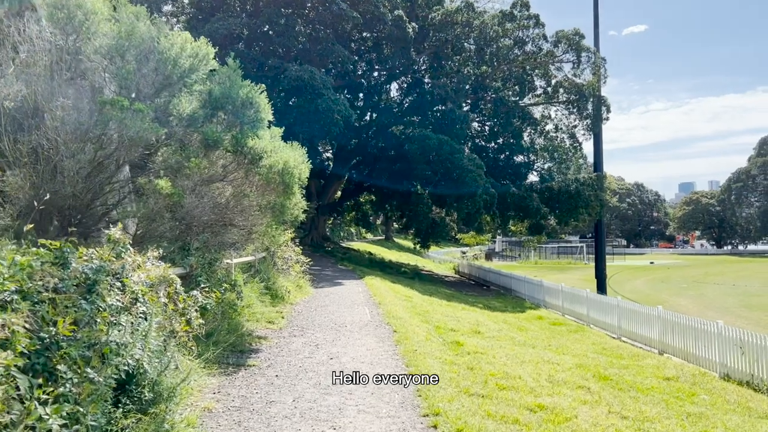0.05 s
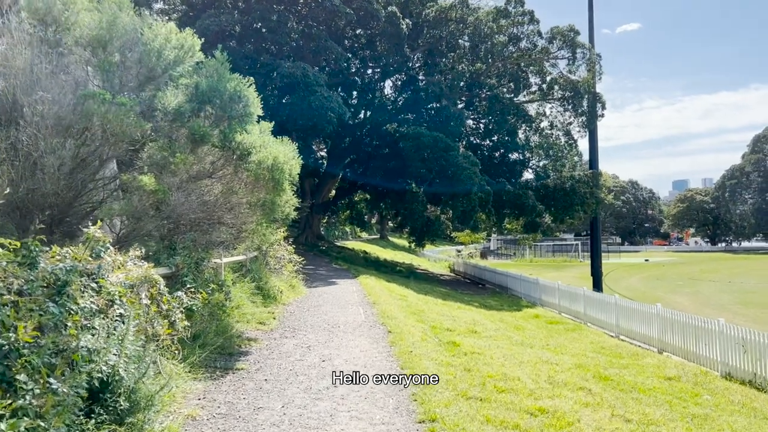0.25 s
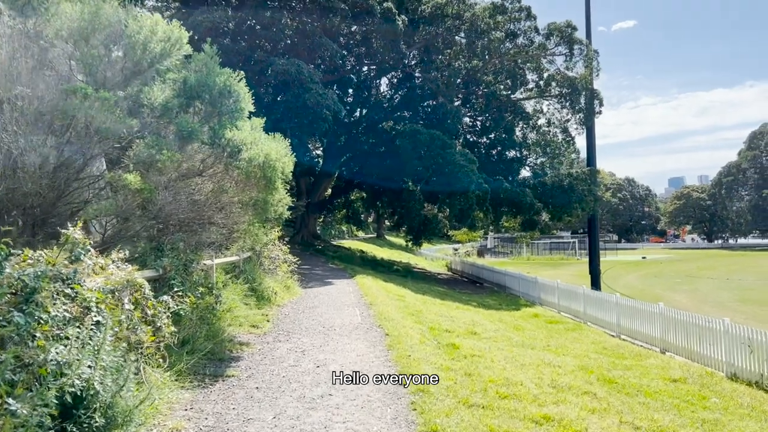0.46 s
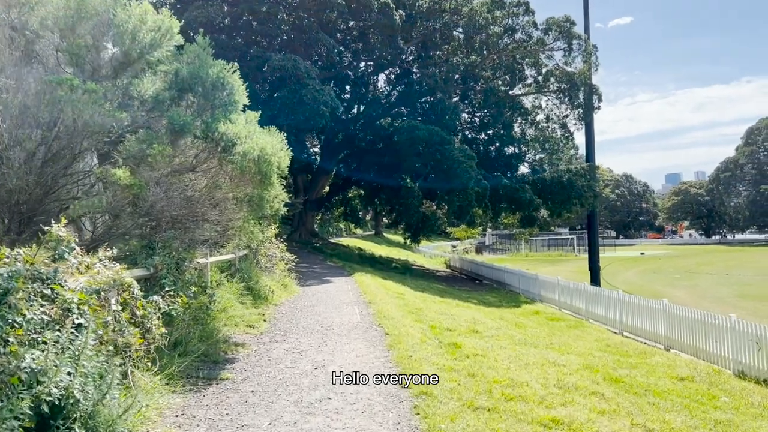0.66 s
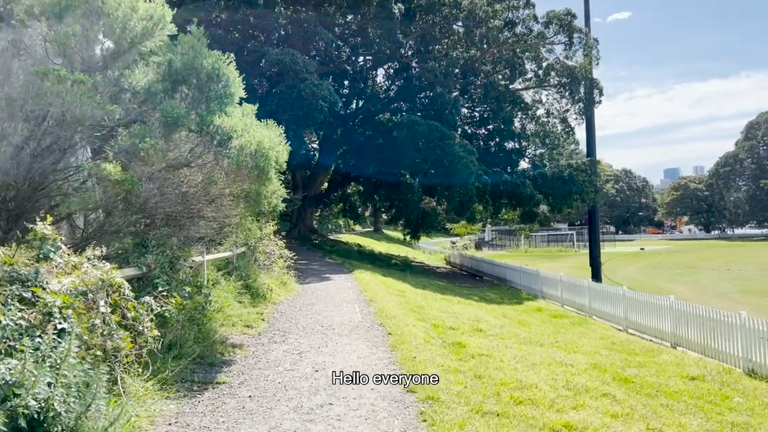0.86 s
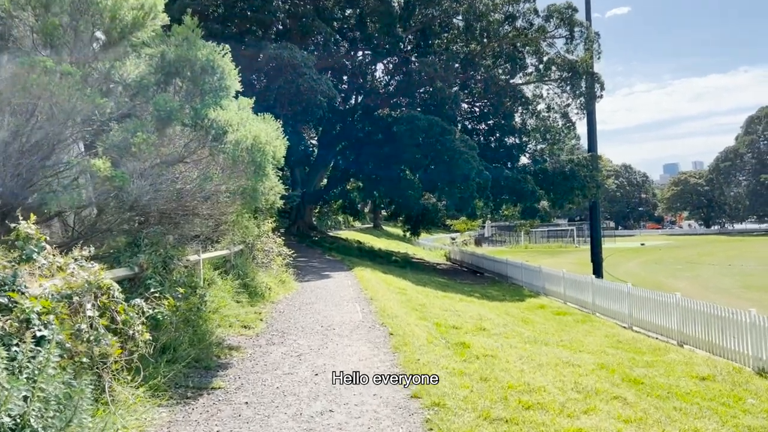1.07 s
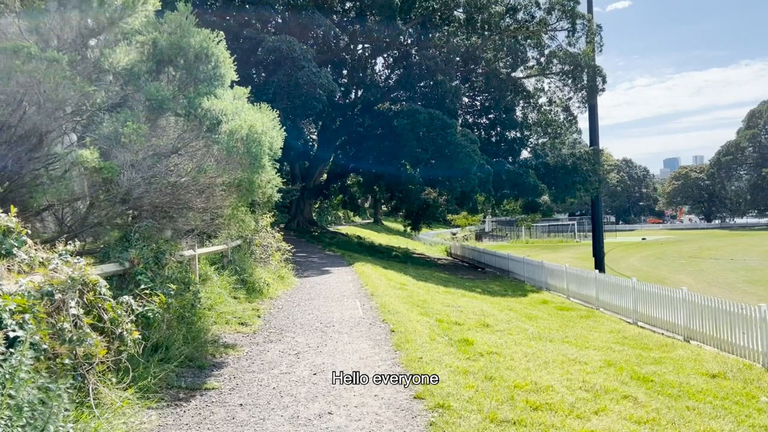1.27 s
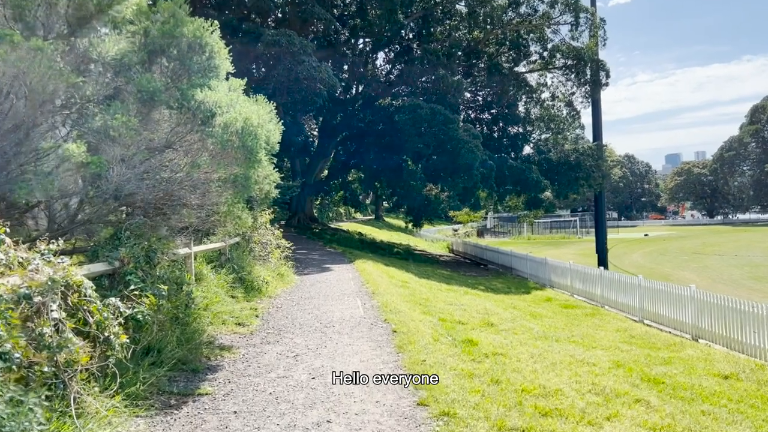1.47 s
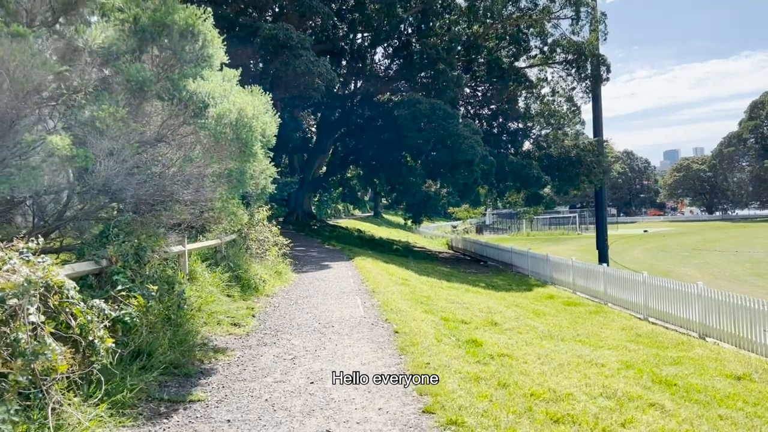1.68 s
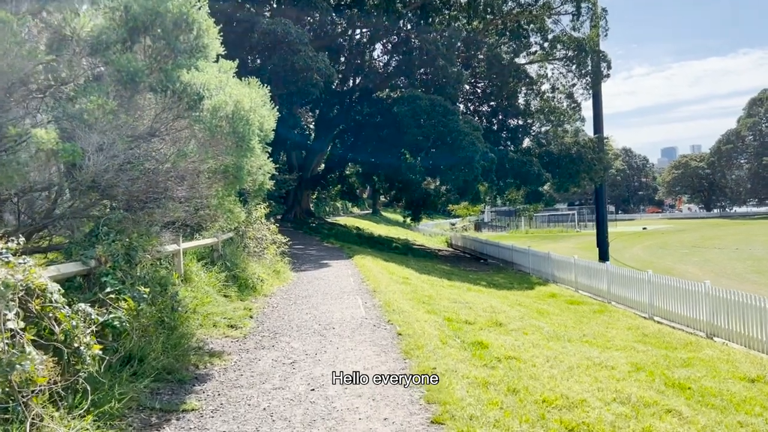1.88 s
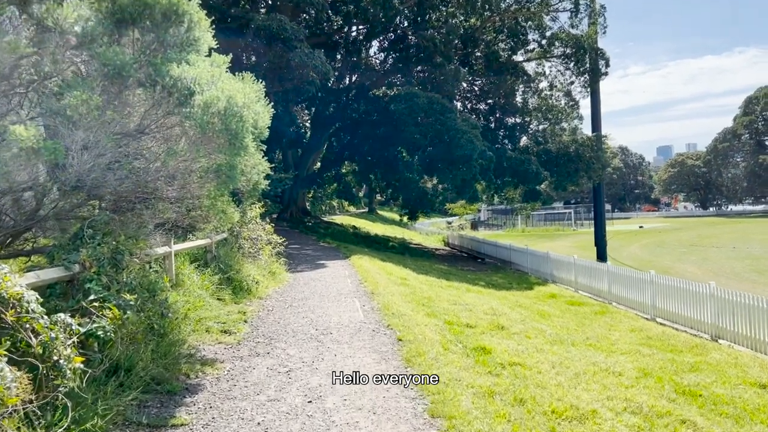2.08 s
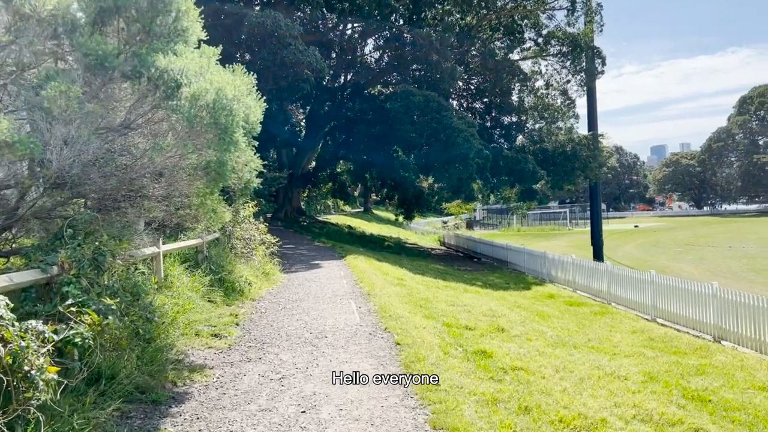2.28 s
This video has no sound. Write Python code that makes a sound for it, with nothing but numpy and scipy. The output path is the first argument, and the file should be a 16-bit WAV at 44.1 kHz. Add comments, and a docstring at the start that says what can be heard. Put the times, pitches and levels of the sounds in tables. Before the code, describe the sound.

Footsteps crunch on a gravel path, with low wind rumble and soft handling bumps on the microphone

```python
"""Footsteps on a gravel path in a park, about two a second, heard from a microphone the walker carries.
Each step grinds a swarm of small stones and sand; larger stones snap as short rings, grit ticks as noise bursts.
Clothes swish as shaped noise, and the hand bumps the recorder with soft slowing swings.
Air rumbles on the microphone as low noise over a faint town, wavering tones of a distant machine
and a few far bird whistles with gliding pitch."""
import sys
import numpy as np
from scipy import signal
from scipy.fft import rfft, irfft
from scipy.io import wavfile
from scipy.ndimage import uniform_filter1d

SR = 44100
rng = np.random.default_rng(int(sys.argv[2]) if len(sys.argv) > 2 else 0)


def log_audio(samples):
    """Write samples as a 16-bit WAV file to the path given in sys.argv[1]."""
    # one column per channel
    frames = np.atleast_2d(samples).T
    # limit to full scale, then quantise
    limited = np.clip(frames, -1, 1)
    pcm = np.round(limited * 32767).astype(np.int16)
    wavfile.write(sys.argv[1], SR, pcm)


N = 102929

# Noise that differs between the two sides. Each row: frequency in Hz, relative level in dB.
DIFFUSE = [(100, -5.5), (1200, 5.5), (2500, 0.5), (6500, 5.5), (9500, -14), (13000, -26)]
# Slow rise of town and loose gravel. Each row: time in seconds, level change in dB.
BACKGROUND_RISE = [(0, -6.5), (.2, -2.5), (.55, 0), (2.33, 1.5)]


def undb(db):
    """Decibels to gain."""
    return 10 ** (np.asarray(db) / 20)


def unit(x):
    """Scale to rms 1."""
    return x / np.sqrt(np.mean(x ** 2))


def over_time(t, points):
    """Interpolate (seconds, value) points linearly."""
    seconds, value = np.array(points).T
    return np.interp(t, seconds, value)


def across(points):
    """Interpolate (Hz, value) points over log frequency at every FFT bin."""
    hz, value = np.array(points).T
    bins_hz = np.fft.rfftfreq(2 * N, 1 / SR)
    return np.interp(np.log(bins_hz + 1), np.log(hz), value)


def colour(x, points):
    """Filter by (Hz, dB) points."""
    return irfft(rfft(x, 2 * N) * undb(across(points)))[..., :N]


def walk(rate_hz):
    """Smoothed random steps, rms 1."""
    k = int(SR / rate_hz)
    steps = np.repeat(rng.standard_normal(N // k + 1), k)
    smooth = uniform_filter1d(uniform_filter1d(steps, k), k)
    return unit(smooth[:N])


def air(points):
    """Coloured noise, partly different on each side, rms 1."""
    common = rng.standard_normal(N)
    separate = colour(rng.standard_normal((2, N)), DIFFUSE)
    return unit(colour(common + separate, points))


def rings(times_s, gains, pitches_hz, decay_cycles, size=400):
    """Stone rings: build up during the contact, then fall by 1/e per decay_cycles."""
    contact_cycles = 0.57
    out, t = np.zeros(N + size), np.arange(size) / SR
    for start_s, gain, hz in zip(times_s, gains, pitches_hz):
        i = int(np.clip(start_s * SR, 0, N))
        cycles = hz * t
        envelope = (1 - np.exp(-cycles / contact_cycles)) * np.exp(-cycles / decay_cycles)
        out[i:i + size] += 2 * gain * np.sin(2 * np.pi * cycles) * envelope
    return out[:N]


def contact_gains(chance, scatter_db):
    """Many small contacts and a few large ones."""
    return undb(-scatter_db * np.log(.02 + .98 * chance))


def town(t):
    """Far traffic as faint coloured noise; its level flickers a little and rises."""
    town_spectrum = [(25, 1), (60, 3.5), (150, 4.5), (280, -4.5), (450, -13), (750, -19.5), (1300, -24),
                     (3000, -24.5), (6000, -34), (9000, -35.5), (15000, -38)]  # Each row: frequency in Hz, relative level in dB.
    level_db, flicker_db, flicker_hz = -45.5, 0.5, 9.7
    change_db = flicker_db * walk(flicker_hz) + over_time(t, BACKGROUND_RISE)
    return air(town_spectrum) * undb(level_db + change_db)


def air_rumble(t):
    """Air buffets the microphone: low noise with an uneven level."""
    # Each row: frequency in Hz, relative level in dB.
    rumble_spectrum = [(20, -29), (35, -8), (58, 4.5), (120, -3.5), (220, -12), (400, -21), (900, -44),
                       (3000, -84)]
    # Each row: time in seconds, level in dB before trim.
    rumble_level = [(0.0, -42), (0.06, -43.5), (0.45, -59), (0.59, -29.5), (0.62, -37.5), (1.0, -37.5),
                    (1.11, -50), (1.19, -46.5), (1.34, -31.5), (1.41, -46.5), (1.69, -38.5), (1.74, -40.5),
                    (1.885, -31.5), (1.95, -40), (1.97, -35.5), (2.16, -38.5), (2.2, -36.5), (2.23, -45.5),
                    (2.33, -34)]
    trim_db = -1
    return air(rumble_spectrum) * undb(over_time(t, rumble_level) + trim_db)


def pebbles(rate_per_s):
    """An even swarm of small stones clicking together, each from its own direction, rms 1."""
    centre_hz, spread_octaves, decay_cycles, scatter_db = 1536, 0.57, 0.84, 4.5
    lag_s, pan_db = 0.00014, 11.5  # full ranges, split between the sides
    when, chance, a, b, sign, place, pan = rng.random((int(rate_per_s * N / SR), 7)).T
    hz = centre_hz * 2 ** (spread_octaves * np.sqrt(6) * (a - b))
    gain = np.sign(sign - .5) * contact_gains(chance, scatter_db)
    sides = []
    for side in (1, -1):
        side_s = when * N / SR + side * lag_s * (place - .5)
        side_gain = gain * undb(side * pan_db * (pan - .5))
        sides.append(rings(side_s, side_gain, hz, decay_cycles))
    return unit(np.array(sides))


def loose_gravel(t):
    """A sparser swarm of clicks that lasts throughout and rises with the town."""
    rate_per_s, level_db = 600, -58
    return undb(level_db + over_time(t, BACKGROUND_RISE)) * pebbles(rate_per_s)


def hand_bumps(t):
    """The hand bumps the recorder with soft swings that slow down and die."""
    # Each row: start in seconds, level in dB before trim, starting pitch in Hz.
    bump_events = [(.03, -36.5, 246), (.033, -36.5, 465), (.125, -42, 190), (0.138, -42, 400),
                   (0.165, -41, 94.5), (.495, -41, 200), (.568, -31, 121), (0.576, -41, 282),
                   (.598, -39, 240), (0.646, -37, 415), (0.653, -37.5, 324), (0.659, -28, 212),
                   (.70, -31, 165), (0.749, -27, 195), (.756, -35, 266), (0.765, -26, 352),
                   (.77, -23.5, 184), (.845, -39, 338), (0.853, -32.5, 144), (.92, -31, 144),
                   (.978, -32, 125), (1.234, -32, 190), (1.312, -33, 248), (1.323, -28.5, 145),
                   (1.336, -34, 240), (1.46, -35, 105), (1.529, -36, 75), (1.603, -29, 210),
                   (1.664, -25.5, 115), (1.696, -30.5, 163), (1.804, -25.5, 219), (1.865, -33, 277),
                   (1.954, -32.5, 395), (1.97, -33.5, 205), (2.016, -37, 336), (2.022, -29.5, 215),
                   (2.031, -31, 159), (2.125, -39, 174), (2.186, -32.5, 131)]
    trim_db, peak_cycles = 4.5, 0.38
    sag = 0.12  # pitch lost per swing
    out = np.zeros(N)
    for start_s, level_db, hz in bump_events:
        age = np.maximum(t - start_s, 0) * hz
        turns = np.log1p(sag * age) / sag
        envelope = age / peak_cycles * np.exp(1 - age / peak_cycles)
        out += undb(level_db + trim_db) * np.sin(2 * np.pi * turns) * envelope
    return out


def machine_hum(t):
    """Tones of a distant machine waver together in pitch, flicker in level, and come and go."""
    # Each row: pitch in Hz, level in dB, mid-swell in seconds, mid-fade in seconds.
    hum_tones = [(137.8, -56.5, 0.3, 3.6), (272.6, -55, 0.22, 1.207), (408, -64, 0.11, 2.7),
                 (543, -59, 0.91, 1.3), (543, -59.5, 1.55, 2.19)]
    wander, wander_hz = .009, 28  # pitch wander as a fraction
    flicker_db, flicker_hz, fade_s = 3, 22, 0.088
    clock = t + np.cumsum(wander * walk(wander_hz)) / SR
    out = np.zeros(N)
    for hz, level_db, start_s, end_s in hum_tones:
        swell = np.clip(np.minimum(t - start_s, end_s - t) / fade_s + .5, 0, 1)
        gain = undb(level_db + flicker_db * walk(flicker_hz))
        out += swell * np.sqrt(2) * gain * np.sin(2 * np.pi * hz * clock)
    return out


def snapping_stones():
    """Larger stones snap under the sole: a ring, a crack at its own pitch and one higher bounce."""
    # Each row: time in seconds, level in dB before trims, pitch in Hz.
    stone_snaps = [(0.152, -33, 1180), (0.216, -33, 1310), (0.262, -33.5, 1300), (.294, -29, 1310),
                   (.328, -28, 1260), (0.51, -36.5, 1390), (.639, -30, 910), (.647, -27, 840),
                   (.682, -34, 1010), (.704, -23.5, 1290), (0.729, -32, 1330), (.755, -26.5, 840),
                   (.764, -25, 4600), (0.795, -24.5, 1220), (0.873, -38, 875), (0.888, -25.5, 1400),
                   (.923, -35, 1310), (.949, -29.5, 1244), (0.978, -30.5, 1190), (1.037, -35.5, 1250),
                   (1.056, -33.5, 1180), (1.118, -33, 1940), (1.198, -26, 1125), (1.237, -27, 1100),
                   (1.2849, -22.5, 1330), (1.3, -15.5, 1840), (1.308, -17.5, 1050), (1.316, -22, 1430),
                   (1.3203, -12, 1250), (1.3253, -26, 1700), (1.333, -22.5, 1520), (1.355, -18.5, 1220),
                   (1.368, -18.5, 1470), (1.378, -17, 1990), (1.399, -16.5, 1250), (1.4199, -14, 1280),
                   (1.516, -29, 1220), (1.712, -22.5, 1320), (1.7505, -27, 1500), (1.759, -15, 1230),
                   (1.779, -24.5, 1200), (1.8145, -15, 1430), (1.833, -32, 1430), (1.8518, -23, 1480),
                   (1.874, -25, 1550), (1.915, -25, 1300), (1.929, -25, 1600), (1.956, -20, 1550),
                   (1.961, -33, 1700), (2.0006, -18.5, 3660), (2.157, -26, 1740), (2.211, -27, 1480),
                   (2.241, -28, 1620), (2.268, -32.5, 874), (2.326, -20, 1490)]
    decay_cycles, ring_db, crack_db, bounce_db = 0.67, 2, -1, -6.5  # bounce relative to ring
    crack_centre_hz, bounce_mean_s = 2630, 0.001592
    when_s, level_db, hz = np.array(stone_snaps).T
    late, pitch = rng.random((len(when_s), 2)).T
    crack_hz = crack_centre_hz * 2 ** (pitch - .5)
    bounce_s = when_s + bounce_mean_s * (.5 + late)
    ring = rings(when_s, undb(level_db + ring_db), hz, decay_cycles)
    crack = rings(when_s, undb(level_db + crack_db), crack_hz, decay_cycles)
    bounce = rings(bounce_s, undb(level_db + ring_db + bounce_db), hz * (1 + pitch), decay_cycles)
    return ring + crack + bounce


def step_pressure(t):
    """Heel and sole press linearly, hold and release exponentially; returns gravel and sand gains."""
    # Each row: start, rise, hold and release in seconds, level in dB, sand relative to gravel in dB.
    presses = [(0.209, 0.083, 0.049, 0.0015, -44, -13.5), (0.706, 0.062, 0.046, 0.054, -45, -8),
               (0.865, 0.018, 0.1, 0.032, -55, -2.5), (1.168, 0.082, 0.024, 0.015, -47.5, -9.5),
               (1.269, 0.029, 0.046, 0.012, -39, -24), (1.34, 0.051, .014, 0.0071, -33, -12.5),
               (1.46, 0.033, 0.081, 0.019, -51.5, -12.5), (1.754, 0.078, 0.046, 0.035, -39.5, -14),
               (1.892, 0.02, 0.024, 0.08, -47, -6.5), (2.292, 0.064, 0.14, .03, -32.5, -15.5)]
    weight, sandy = np.zeros(N), np.zeros(N)
    for start_s, rise_s, hold_s, release_s, level_db, sand_db in presses:
        rise = np.clip((t - start_s) / rise_s, 0, 1)
        release = np.exp(-np.maximum(t - start_s - rise_s - hold_s, 0) / release_s)
        press = undb(level_db) * rise * release
        weight += press
        sandy += press * undb(sand_db)
    return weight, sandy


def ground_pebbles():
    """Small stones give way in clusters, so the swarm's level wavers quickly; rms 1."""
    rate_per_s, cluster_db, cluster_hz = 2600, 1.5, 220
    return unit(pebbles(rate_per_s) * undb(cluster_db * walk(cluster_hz)))


def sand():
    """Dense fine crackle from random single-sample impulses, rms 1."""
    sand_spectrum = [(300, -35), (1500, -40), (3000, 9), (4300, 2), (5700, 3), (8000, -7.5), (15000, -12.5)]  # Each row: frequency in Hz, relative level in dB.
    rate_per_s, scatter_db = 4100, 5
    hit, chance, sign = rng.random((3, N))
    impulses = (hit < rate_per_s / SR) * np.sign(sign - .5) * contact_gains(chance, scatter_db)
    return unit(colour(impulses, sand_spectrum))


def grit(t):
    """Single bits of grit crack in very short bright noise bursts."""
    # Each row: time in seconds, level in dB before trim.
    tick_events = [(0.25, -36.5), (.335, -28), (.764, -29), (0.888, -43), (0.977, -43), (1.185, -29.5),
                   (1.315, -32), (1.419, -31), (1.491, -33), (1.7588, -34), (1.815, -35), (1.886, -26.5),
                   (1.964, -34), (1.987, -28), (2.056, -37), (2.211, -32.5)]
    # Each row: frequency in Hz, relative level in dB.
    tick_spectrum = [(500, -26), (2000, 4), (5500, 8), (9000, 4.5), (15000, -1.5)]
    decay_s, trim_db = 0.00035, 1
    bursts = np.zeros(N)
    for start_s, level_db in tick_events:
        bursts += undb(level_db + trim_db) * (t >= start_s) * np.exp(-np.abs(t - start_s) / decay_s)
    noise = rng.standard_normal(N) / np.sqrt(decay_s * SR / 2)
    return colour(bursts * noise, tick_spectrum)


def surroundings(x):
    """Quick reflections off body and ground, then a faint tail from the bushes."""
    t = np.arange(SR // 5) / SR
    out = x
    for decay_s, level_db in ((0.0032, -12), (0.015, -26.5)):
        envelope = np.exp(-t / decay_s) * (1 - np.exp(-2 * t / decay_s))
        echo = rng.standard_normal((2, len(t))) * envelope
        echo = echo / np.sqrt(np.sum(echo ** 2, axis=1, keepdims=True))
        reflected = signal.fftconvolve(x, echo, axes=1)[:, :N]
        out = out + undb(level_db) * colour(reflected, DIFFUSE)
    return out


def footsteps(t):
    """Step weight drives pebbles and sand; snaps, loose gravel and grit share the reflections."""
    gravel_spectrum = [(100, -23), (450, 2), (800, -1), (1300, 0), (2200, 1), (3300, 1.5), (4300, -2),
                       (5700, 0), (8000, -12), (15000, 9)]  # Each row: frequency in Hz, relative level in dB.
    weight, sandy = step_pressure(t)
    stones = weight * ground_pebbles() + snapping_stones() + loose_gravel(t)
    return surroundings(colour(stones, gravel_spectrum) + sandy * sand() + grit(t))


def clothes(t):
    """Fabric brushes past as the legs swing: noise under smooth bell-shaped swells."""
    # Each row: centre in seconds, half width to 1/e in seconds, level in dB.
    swish_events = [(.65, 0.12, -50.5), (1.671, 0.077, -52)]
    # Each row: frequency in Hz, relative level in dB.
    cloth_spectrum = [(300, 7), (1500, 1), (3000, 3), (5500, -4), (8000, -5.5), (13000, -3.5), (16000, -10)]
    swing = np.zeros(N)
    for centre_s, width_s, level_db in swish_events:
        swing += undb(level_db) * np.exp(-((t - centre_s) / width_s) ** 2)
    return swing * air(cloth_spectrum)


def birds(t):
    """Far birds give a few thin, mostly falling whistles, blurred by the trees."""
    # Each row: start and length in seconds, first and last pitch in Hz before waver, level in dB before trim.
    whistle_notes = [(.87, .05, 3850, 3400, -63), (.925, .05, 4000, 3700, -58),
                     (.945, .04, 3450, 3200, -57), (.97, .055, 2850, 3150, -56),
                     (.945, .075, 5850, 5450, -61), (1.015, .07, 5200, 5000, -66),
                     (1.035, .06, 2600, 2480, -61)]
    trim_db, echo_decay_s, echo_db = -4.5, .016, -3
    waver = 1 + .018 * walk(150)
    song = np.zeros(N)
    for start_s, length_s, from_hz, to_hz, level_db in whistle_notes:
        along = np.clip((t - start_s) / length_s, 0, 1)
        hz = (from_hz + (to_hz - from_hz) * along) * waver
        envelope = np.sqrt(4 * along * (1 - along))
        song += undb(level_db + trim_db) * envelope * np.sin(2 * np.pi * np.cumsum(hz) / SR)
    echo = rng.standard_normal((2, N)) * np.exp(-t / echo_decay_s) / np.sqrt(echo_decay_s * SR / 2)
    return song + undb(echo_db) * signal.fftconvolve(song[None], echo, axes=1)[:, :N]


def scene():
    """All sources summed on two sides."""
    t = np.arange(N) / SR
    background = town(t) + machine_hum(t)
    handling = air_rumble(t) + hand_bumps(t)
    return background + handling + footsteps(t) + clothes(t) + birds(t)


def record(dry):
    """Stereo processing shifts time and level between the sides by frequency: the left leads
    in the middle, the right at the top; the deepest bass and the top are cut."""
    # Each row: frequency in Hz, lead of the left in ms.
    lead_ms = [(100, 0), (900, .02), (1500, .06), (2500, .14), (6000, .16), (7500, -.148), (16000, -.148)]
    # Each row: frequency in Hz, left minus right in dB.
    balance_db = [(200, 0.3), (700, -1.8), (1400, -3.2), (2500, -3), (3600, 7), (5500, 7.5), (7500, 5.5),
                  (9500, -0.5)]
    low_cut_hz, top_hz = 43, 15800
    sides = np.array([[.5], [-.5]])
    turn = 2 * np.pi * np.fft.rfftfreq(2 * N, 1 / SR) * across(lead_ms) / 1000
    response = undb(sides * across(balance_db)) * np.exp(1j * sides * turn)
    pair = irfft(rfft(dry, 2 * N) * response)[:, :N]
    low_cut = signal.butter(2, low_cut_hz, "high", fs=SR, output="sos")
    top_cut = signal.ellip(10, .2, 80, top_hz, fs=SR, output="sos")
    return signal.sosfilt(top_cut, signal.sosfilt(low_cut, pair))


dry = scene()
out = record(dry)
log_audio(out)
```